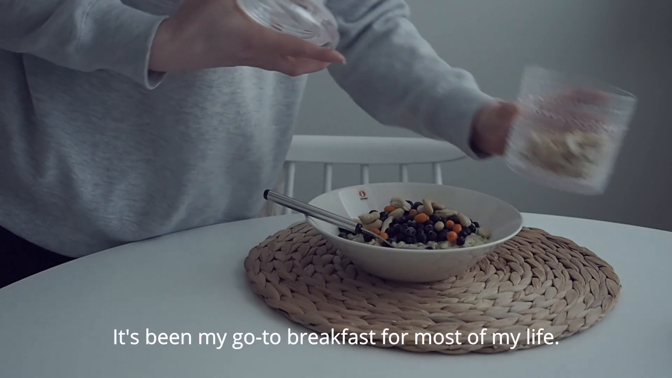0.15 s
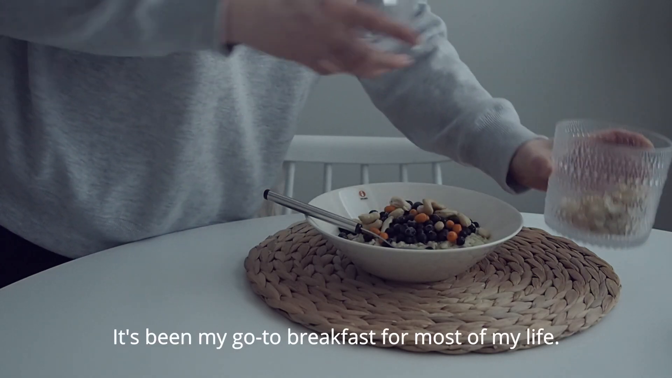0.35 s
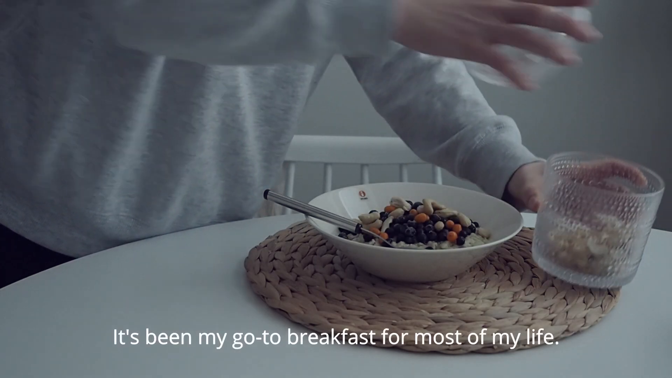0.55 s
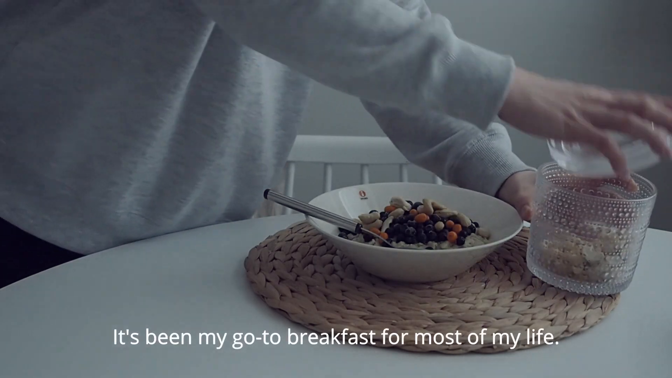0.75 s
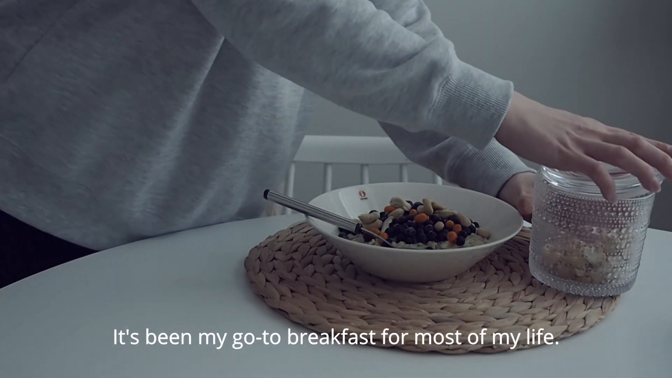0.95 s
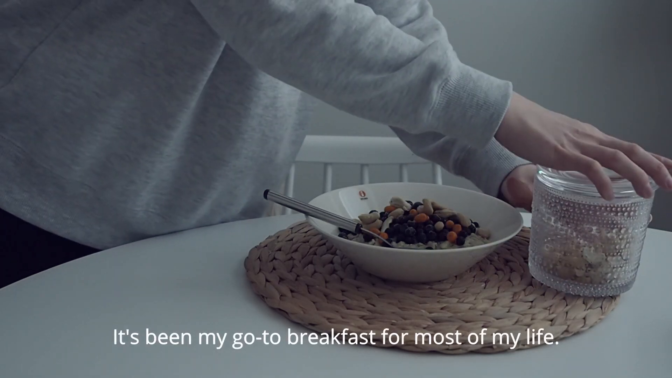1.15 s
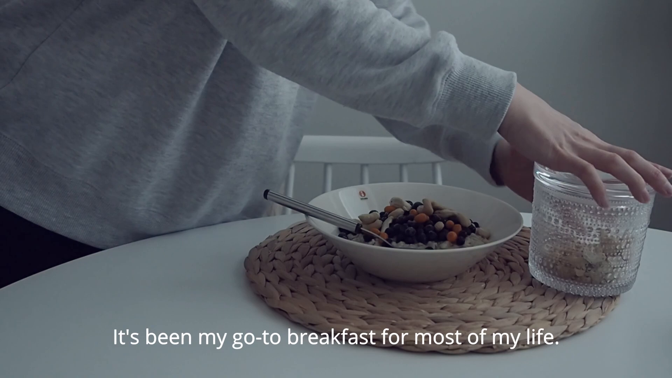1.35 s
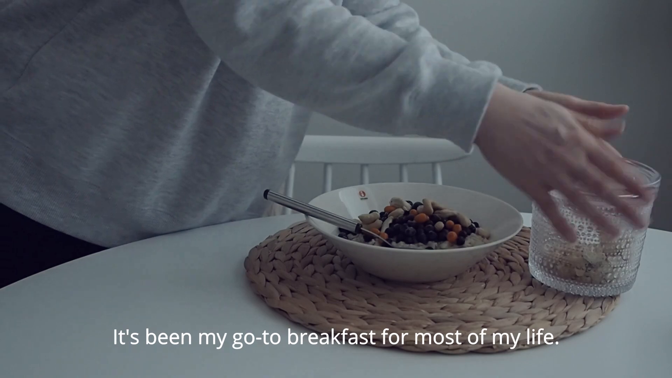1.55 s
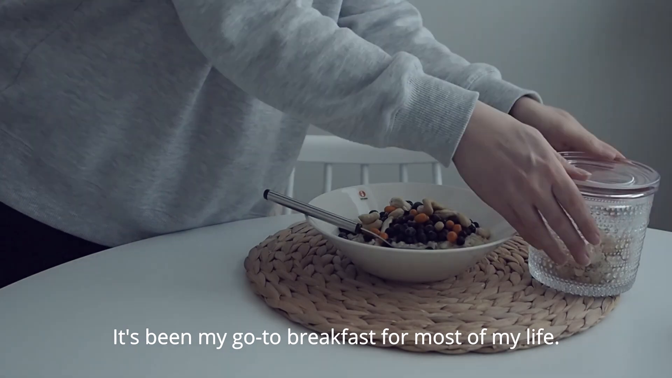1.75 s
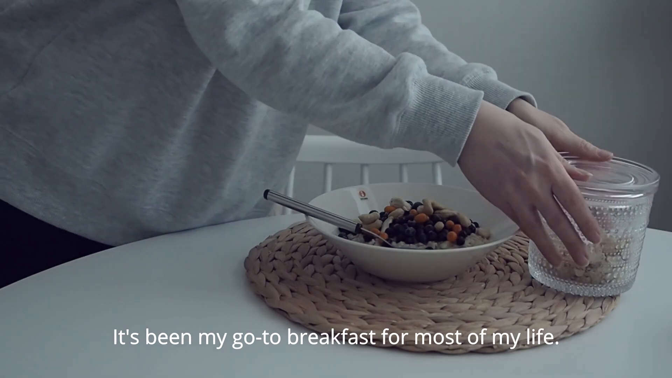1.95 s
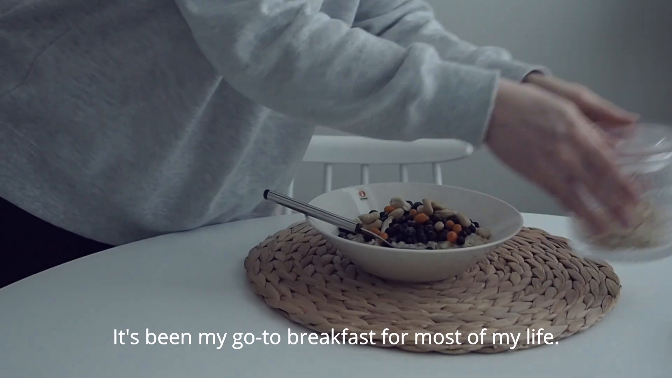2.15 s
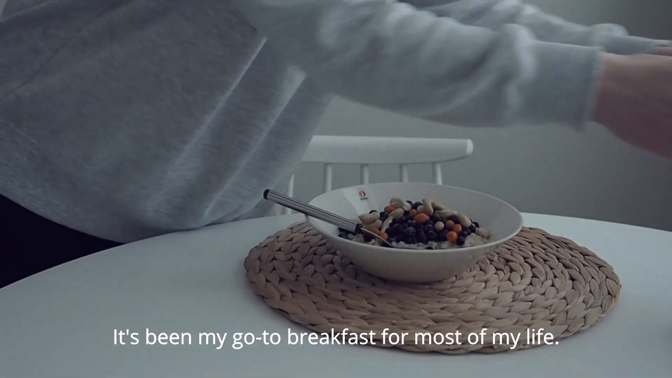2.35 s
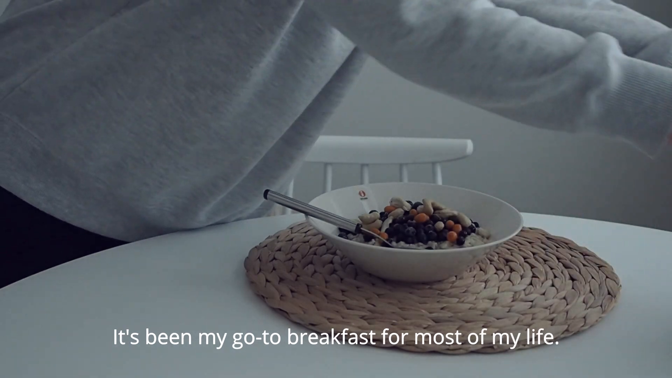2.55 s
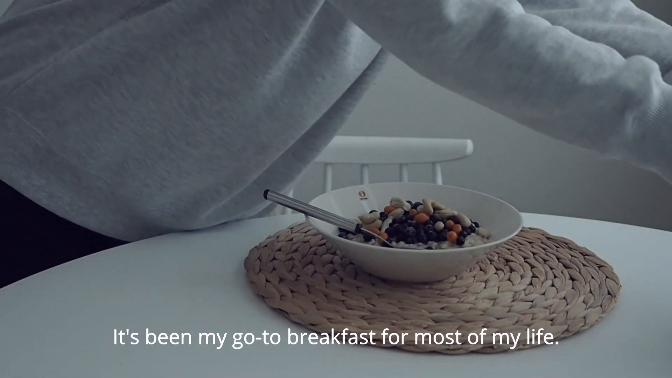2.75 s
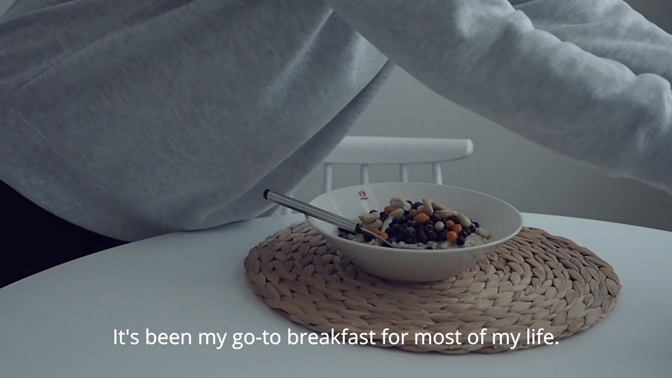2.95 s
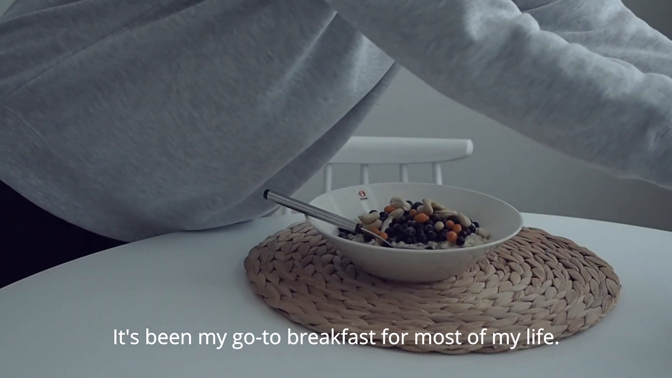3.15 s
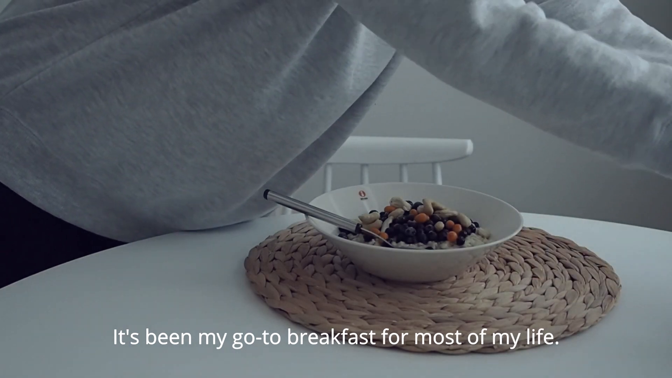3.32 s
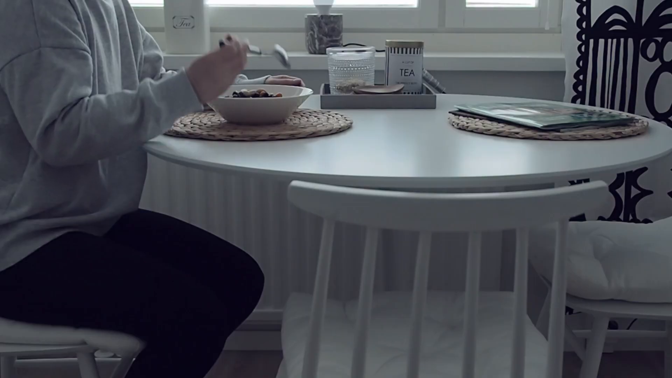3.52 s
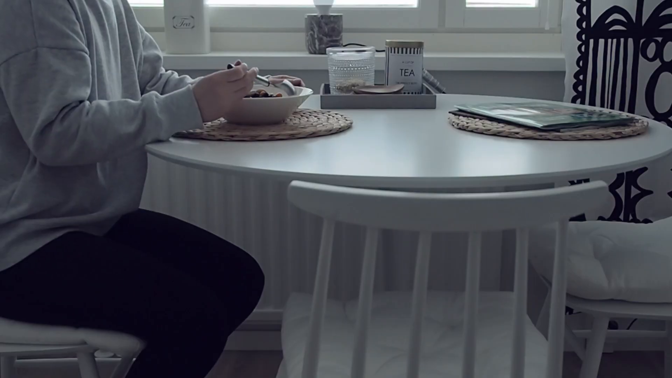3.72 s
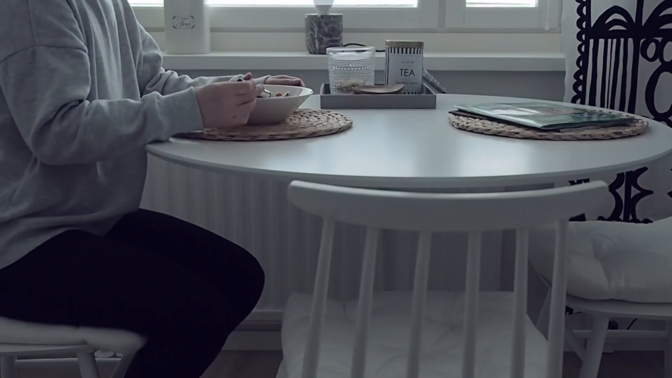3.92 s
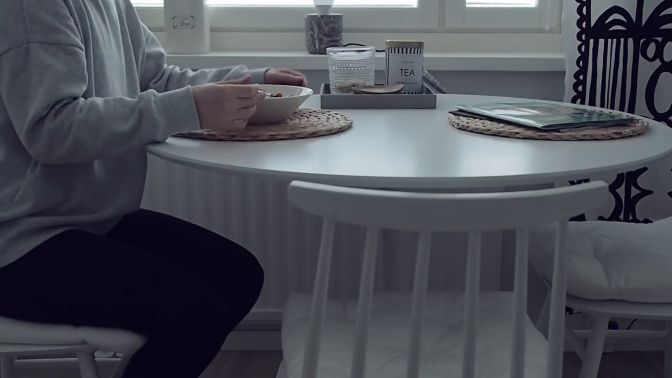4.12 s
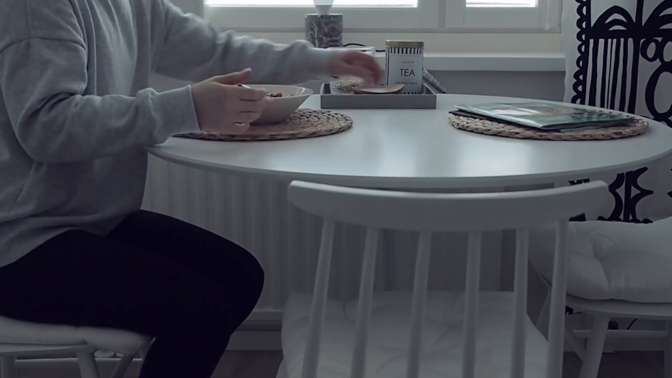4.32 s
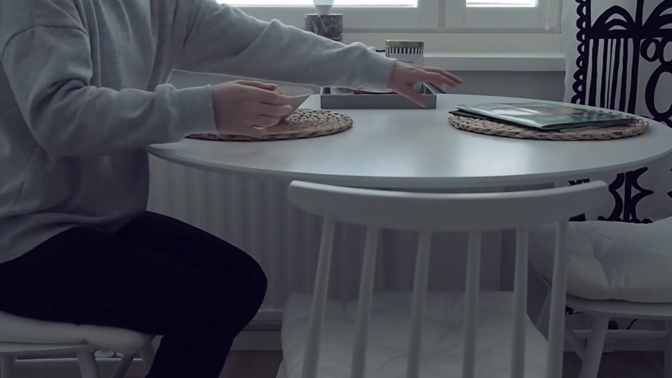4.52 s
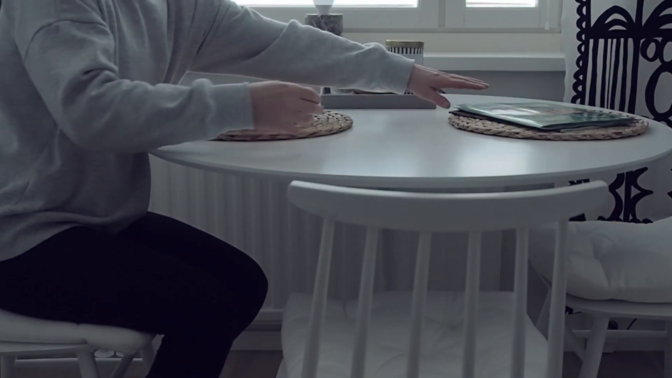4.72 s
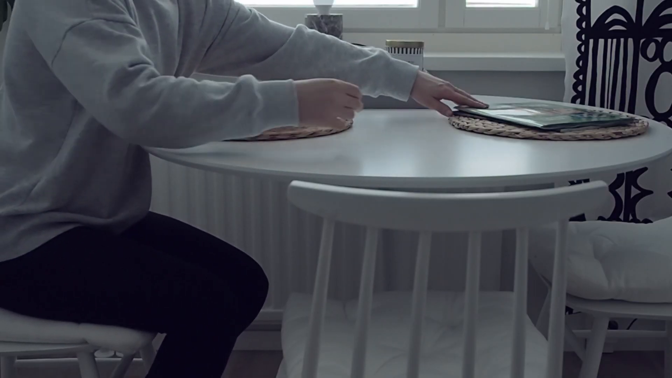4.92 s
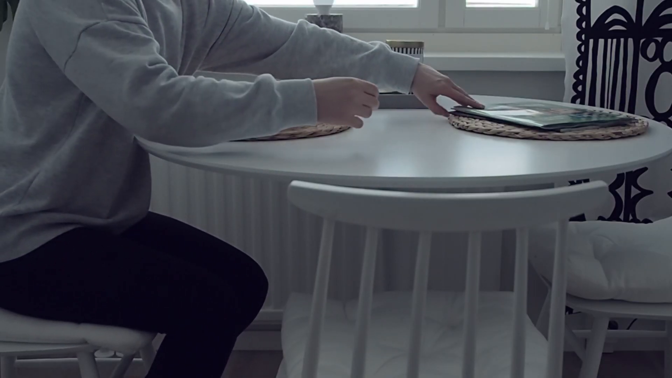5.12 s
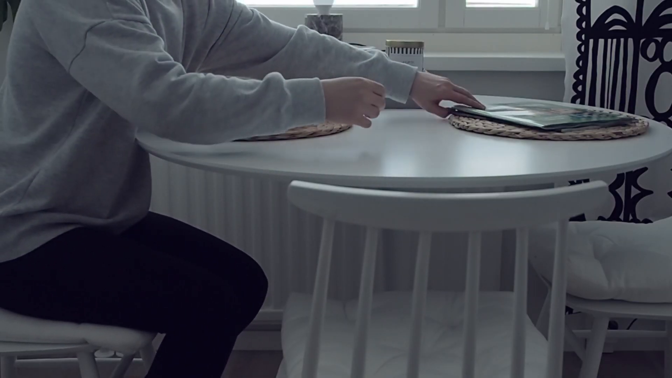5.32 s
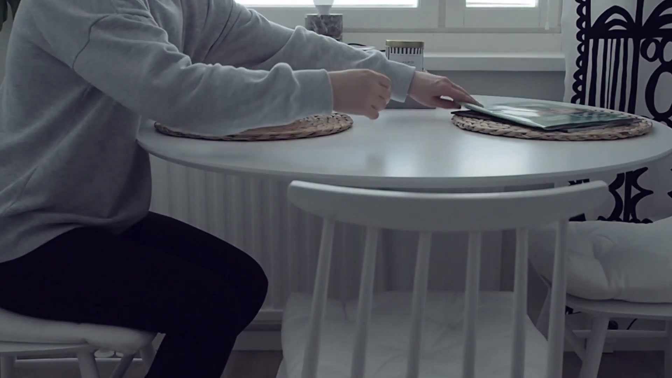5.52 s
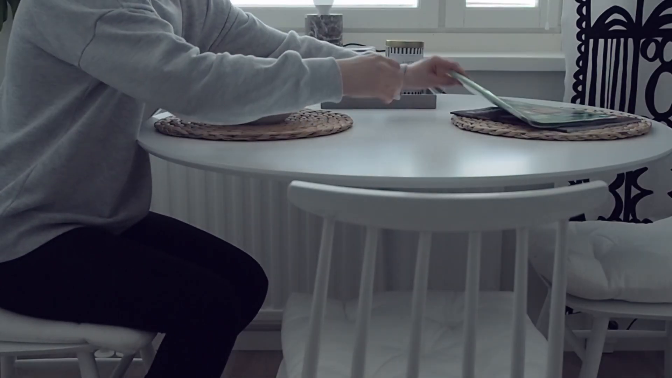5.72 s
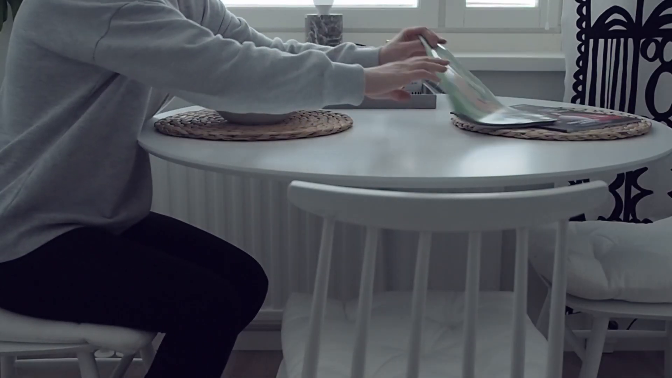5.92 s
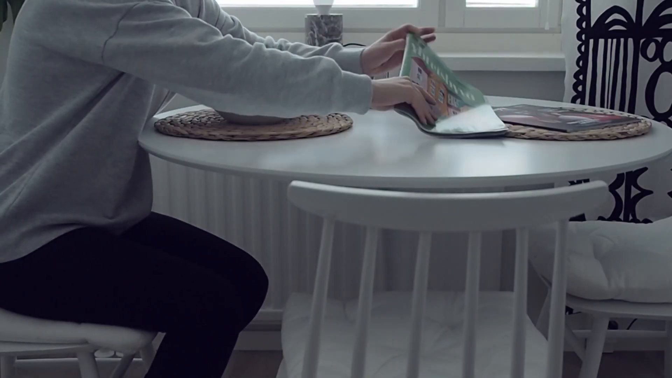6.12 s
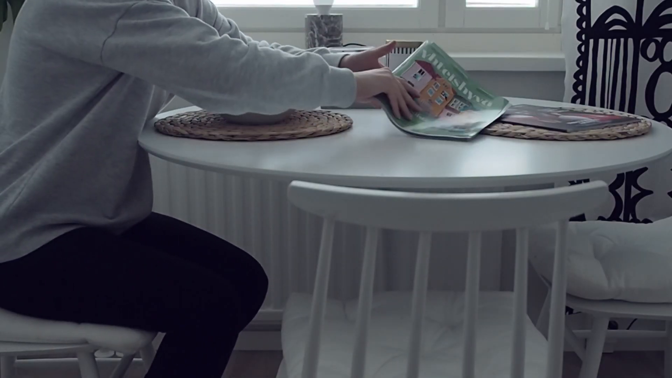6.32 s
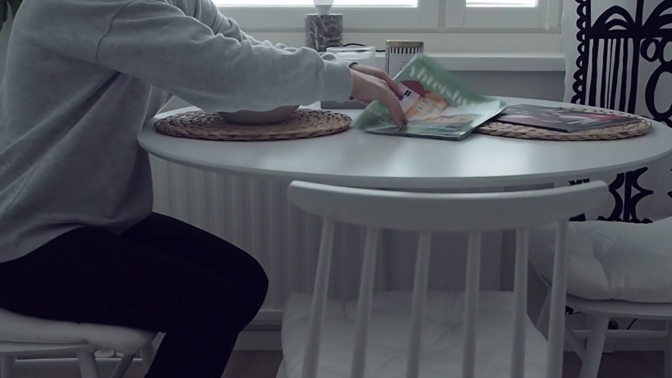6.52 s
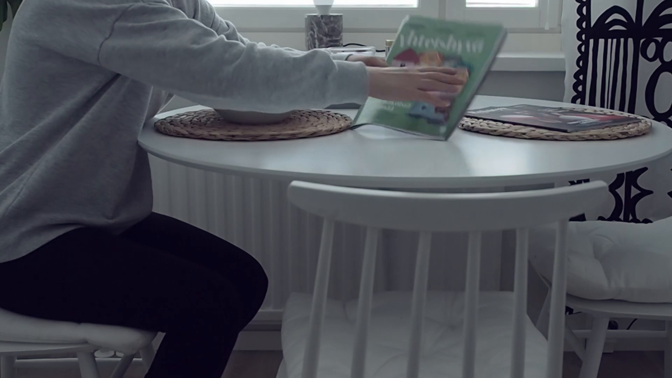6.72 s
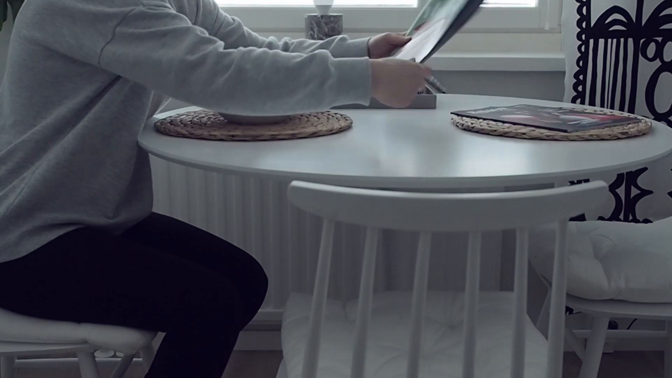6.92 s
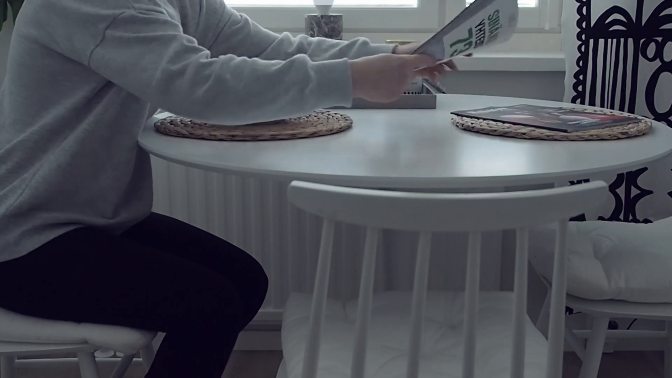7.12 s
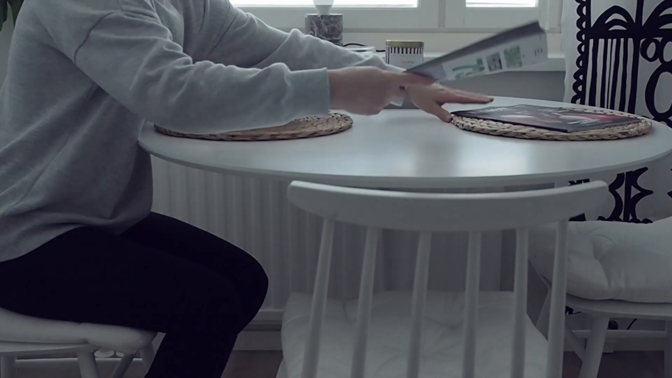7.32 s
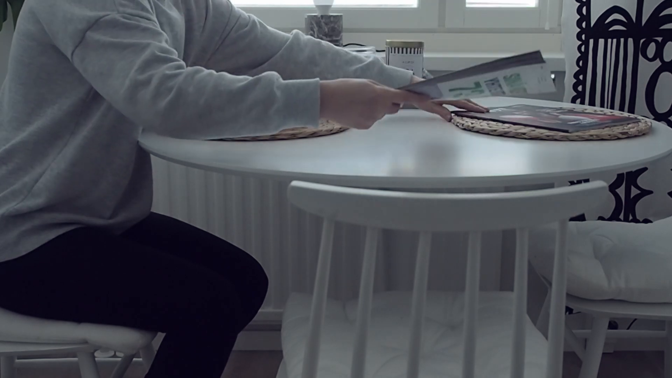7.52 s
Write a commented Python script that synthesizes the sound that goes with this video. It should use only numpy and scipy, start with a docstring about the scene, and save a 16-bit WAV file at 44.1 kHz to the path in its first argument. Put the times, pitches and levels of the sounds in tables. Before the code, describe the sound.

Close stereo pickup of breakfast handling, leaning slightly left, with a short live room tail. Brief cloth rustle and faint glass touches come first, then bright lid-on-jar clinks dying into small rattles. Near silence holds a few dull taps. A heavy wooden knock follows with smaller ones, then sharp spoon-on-bowl clinks. Finally a magazine is dragged over, with dry swishes, fine crackle and soft papery bumps, over faint air noise.

```python
"""A sleeve rubs the table and a glass lid sings under the fingers, then clinks down onto its jar in a bare kitchen.
Soft taps follow; the jar is set down on wood, a spoon drops into a ceramic bowl, and a magazine slides and flaps.
Ringing is modal synthesis, knocks are chattering contacts through damped bodies, sliding is shaped noise.
Blows pass through decaying room responses, over steady faint noise."""
import sys
import numpy as np
from scipy import signal
from scipy.fft import rfft, irfft
from scipy.io import wavfile
from scipy.ndimage import uniform_filter1d

SR = 44100
rng = np.random.default_rng(int(sys.argv[2]) if len(sys.argv) > 2 else 0)


def generate_wav(signal):
    """Clip the signal to [-1, 1] and save it as 16-bit WAV at the path in sys.argv[1]."""
    frames = np.transpose(np.atleast_2d(signal))
    scaled = np.clip(frames, -1, 1) * 32767
    pcm = np.round(scaled).astype(np.int16)
    wavfile.write(sys.argv[1], SR, pcm)


N = 337806  # length of the scene [samples]
SIZE = 32768  # length of one blow with its room tail [samples]
T, HZ = np.arange(SIZE) / SR, np.fft.rfftfreq(SIZE, 1 / SR)

# hiss spectrum of skin, cloth and paper: (frequency [Hz], relative density [dB per Hz])
HISS = [(1000, -30), (4000, 8), (6500, -1), (8500, 3), (11000, -3.5), (15500, -2)]


def amp(db):
    """Decibel law: 20 dB is a factor of ten in amplitude."""
    return 10 ** (np.asarray(db) / 20)


def evened(x):
    """Normalisation to unit root-mean-square value."""
    return x / np.sqrt(np.mean(abs(x) ** 2) + 1e-30)


def read(points, hz):
    """Interpolation along a logarithmic frequency axis, as the ear spaces pitch."""
    f, value = np.transpose(points)
    return np.interp(np.log(hz + 1), np.log(f), value)


def tilt(hz, slope_db):
    """Contact stiffness: harder contacts lean the spectrum towards the treble [dB/octave about 2 kHz]."""
    return amp(slope_db * np.log2(np.clip(hz, 200, 10000) / 2000))


def sides(pan_db):
    """Level difference between the channels: positive values lean to the left."""
    return amp(np.array([[.5], [-.5]]) * pan_db)


def add(mix, s, spectrum):
    """Superposition of one blow; its dB is the rms it would have if packed into a twentieth of a second."""
    fade = np.clip(10 * (1 - T / T[-1]), 0, 1) ** 2
    sound = irfft(spectrum) * np.sqrt(SR / 20) * fade
    part = mix[:, max(round(s * SR), 0):][:, :SIZE]
    part += sound[:, :part.shape[1]]


def room(direct=0.31, early=0.17, early_s=.02, build_s=0.0012):
    """Room impulse response at two microphones: direct sound, a few wall echoes and a dense decaying tail."""
    # reverberation time of the kitchen: (frequency [Hz], t60 [s])
    room_t60 = [(100, 0.74), (300, 0.28), (1000, 0.5), (3000, 0.45), (6000, 0.43), (10000, 0.3),
                (16000, 0.24)]
    hz, t, z = signal.stft(rng.standard_normal((2, SIZE)), SR, nperseg=256)
    decay = amp(-60 * t / read(room_t60, hz)[:, None])
    tail = signal.istft(z * decay, SR, nperseg=256)[1][:, :SIZE]
    tail = evened(tail * (1 - np.exp(-T / build_s))) / np.sqrt(SIZE)
    echoes = (rng.random(size=(2, 8)) * early_s * SR).astype(int)
    echo_gains = early * (2 * rng.random(echoes.shape) - 1)
    np.put_along_axis(tail, echoes, echo_gains, 1)
    tail[[0, 1], rng.integers(10, 40, size=2)] += direct
    return rfft(tail)


def resonance(hz, width_hz):
    """Response of a damped oscillator: unity at its own frequency, width_hz wide."""
    return 1j * HZ * width_hz / (hz ** 2 - HZ ** 2 + 1j * HZ * width_hz)


def struck(modes, share):
    """Modal excitation: where a thing is struck decides which modes sound; this blends two striking places."""
    share = np.clip(share, 0, 1)
    return [(hz, first_db + share * (second_db - first_db), t60) for hz, first_db, second_db, t60 in modes]


def ring(modes, path, slope_db=0, choke_hz=np.inf):
    """Modal superposition in the room; contact damping chokes modes above choke_hz into short, wide bursts."""
    out = np.zeros(path.shape, complex)
    for hz, db, t60 in modes:
        free_width_hz = np.log(1000) / (np.pi * np.clip(t60, .02, .5))
        free = evened(resonance(hz, free_width_hz) * path)
        choked = evened(resonance(hz, .02 * hz) ** 2 * path)
        share = 1 / (1 + (choke_hz / hz) ** 2)  # half the power is choked at choke_hz
        quarter_cycle = np.exp(-2j * np.pi * HZ / (4 * hz))  # keeps the two parts from cancelling
        mode = evened(np.sqrt(1 - share) * free + np.sqrt(share) * choked * quarter_cycle)
        out += rng.choice([-1, 1]) * amp(db) * tilt(hz, slope_db) * mode
    return out


def knock(colour, path, slope_db, contact_s, catches_per_s=2500):
    """Impact excitation: a dying chatter of tiny contacts drives a heavily damped body in the room."""
    log_gain = np.log(amp(read(colour, HZ)) * tilt(HZ, slope_db))
    mirrored = np.r_[log_gain, log_gain[-2:0:-1]]
    body = np.exp(np.conj(signal.hilbert(mirrored))[:len(HZ)])  # minimum phase, hence causal
    catches = rng.standard_normal(SIZE) * (rng.random(SIZE) < catches_per_s / SR)
    chatter = catches * np.exp(-T / contact_s)
    chatter[0] = 0.26  # the first touch
    return evened(body * rfft(chatter) * path)


def hollow_note(hz, db, t60, path, swell_s=0.0024):
    """Damped resonance between gentle low and high cuts: a short hollow note that swells before it decays."""
    note = ring([(hz, db, t60)], path)
    hollow = irfft(note / (1 + (HZ / 2500) ** 2) / (1 + (200 / (HZ + 1)) ** 2))
    return rfft(hollow * (1 - np.exp(-T / swell_s)))


def noise(colour):
    """Spectral shaping of steady random noise, uncorrelated between the two microphones."""
    gain = amp(read(colour, np.fft.rfftfreq(N, 1 / SR)))
    return evened(irfft(rfft(rng.standard_normal((2, N))) * gain, N))


def still_air(floor_db=-56):
    """Stationary background noise: the faint, steady sound of the room's still air."""
    # spectrum of the background: (frequency [Hz], relative density [dB per Hz])
    floor_colour = [(12, -15), (20, 7.5), (35, -13.5), (55, -17), (299, -8), (374, -12.5), (772, -7.5),
                    (1020, -5.5), (1110, -7), (1730, -6.5), (2230, -18), (3030, -10.5), (6250, -23),
                    (8990, -20), (15700, -28)]
    return amp(floor_db) * noise(floor_colour)


def stroke(start, length, t60, speed_up_share=0.57):
    """Friction follows speed: a stroke gathers speed, holds, and dies away once the hand stops."""
    t = np.arange(N) / SR - start
    rise = np.clip(t / (speed_up_share * length), 0, 1)
    return rise * np.exp(-np.log(1000) * np.clip((t - length) / t60, 0, 2))


def sliding(crackle_db=-6, crackles_per_s=200, rub_t60_s=1, hiss_t60_s=0.47):
    """Friction noise: cloth and paper drag over the table while fibres snap free in a fine crackle."""
    # strokes of sleeve and paper: (start [s], length [s], rub level [dB], hiss level before crackle [dB])
    strokes = [(0, 0.054, -53.5, -57), (0.076, 0.11, -51.5, -56), (0.549, 0.04, -56, -60.5),
               (4.375, 0.055, -59.5, -61), (4.803, 0.043, -62, -58), (4.978, 0.12, -61, -61),
               (5.285, 0.13, -56.5, -53), (5.594, 0.27, -53, -54), (5.826, .31, -55, -51),
               (6.22, 0.09, -59.5, -56.5), (6.388, 0.12, -55, -54.5), (6.597, 0.074, -54.5, -54.5),
               (6.806, .08, -55.5, -48), (6.913, 0.034, -57, -73), (7.404, 0.11, -56.5, -58.5),
               (7.58, 0.12, -57, -51.5)]
    # spectrum of the rubbing: (frequency [Hz], relative density [dB per Hz])
    rub_colour = [(150, -55), (500, -11), (1000, -0.5), (2500, -5.5), (4300, -1), (7000, -24), (15000, -36)]
    snaps = rng.exponential(size=N) * (rng.random(N) < crackles_per_s / SR)
    bursts = evened(signal.oaconvolve(snaps, np.exp(-T / .001))[:N])
    rub = noise(rub_colour)
    hiss = noise(HISS) + amp(crackle_db) * bursts * noise(HISS)
    # overlapping strokes add in power
    rub_power = sum((amp(db) * stroke(s, length, rub_t60_s)) ** 2 for s, length, db, _ in strokes)
    hiss_power = sum((amp(db) * stroke(s, length, hiss_t60_s)) ** 2 for s, length, _, db in strokes)
    return rub * np.sqrt(rub_power) + hiss * np.sqrt(hiss_power)


def lid(air_t60=0.028, air_lead_s=0.00501, ring_direct=0.85, contact_s=0.0049, choke_hz=10000):
    """Modal ringing and cavity air: the lid sings under the fingers, then rattles onto the jar with air pops."""
    # lid ringing alone in the hand: (frequency [Hz], level [dB], t60 [s])
    lid_modes = np.transpose([ [823, 1326, 2150, 2985, 6928, 8177, 10645, 13355],
                 [-12, -11, -14, 0, -10, -20, -10, -17], [.05, .25, .05, .13, .14, .1, .14, .1]])
    # jar with its lid: (frequency [Hz], level landing flat [dB], level striking the rim [dB], t60 [s])
    jar_modes = np.transpose([ [1326, 1354, 1565, 2090, 2960, 2990, 3794, 5100, 5160, 6930, 7710, 8160, 8270, 9178, 9362, 10793, 12252, 13370, 14238, 14375, 14710, 15287],
                 [0, -15, -19, -30, -16, -14, -36, -8, -24, -44, -33, -23, -33, -28, -29, -30, -39, -44, -33, -35, -43, -48],
                 [-10, -3, -20, -16, -7, -1, -15, -17, -18, -32, -26, -18, -21, -20, -21, -29, -28, -35, -38, -35, -33, -32],
                 [.35, .14, .15, .1, .1, .28, .15, .22, .06, .15, .08, .12, .05, .1, .06, .12, .08, .08, .1, .08, .05, .08]])
    # skin catching on the lid: (time [s], ring level [dB], ring tilt [dB/octave], scuff level [dB])
    touches = [(0.011, -47, -1, -68), (0.065, -45, -3, -64), (.132, -61, 5, -57), (0.203, -42.5, -1, -50),
               (.225, -54.5, 4.5, -46)]
    # glass on glass: (time [s], ring level [dB], rim share [0-1], ring tilt [dB/octave],
    # knock level [dB], knock tilt [dB/octave], air pop level before its filter and swell [dB])
    clinks = [(.821, -24.5, 0.03, -3, -42, -1.5, -27.5), (.846, -33.5, 0.55, 0, -50, -4, -38),
              (.867, -41, 0.76, -11, -51, -5, -45), (1.017, -25, 0.93, -3.5, -32, 1, -39),
              (1.045, -42, 1, 3, -43, 1, -35.5), (1.075, -35, 0.23, 2, -41, -1, -37.5),
              (1.165, -46, 0.9, -2, -50, 0, -47.5), (1.258, -51, 0.96, 3, -32.5, 3, -45),
              (1.361, -68, 1, -7, -50.5, -13, -62), (2.274, -59.5, 0.8, 5.5, -45, 0.5, -71),
              (2.306, -59, 1, 16, -48.5, 5, -57)]
    # spectrum of the glass knock: (frequency [Hz], relative density [dB per Hz])
    glass_colour = [(120, -57), (250, -13.5), (600, -0.5), (1700, 1.5), (2500, -4.5), (3800, -1),
                    (5600, -15), (6500, -12.5), (7200, -33), (8600, -18.5), (10000, -45), (15500, -44)]
    gap_open_hz, gap_sag_hz_per_s, gap_shut_hz = 743, 855, 293
    out = np.zeros((2, N))
    for s, db, slope_db, scuff_db in touches:
        singing = amp(db) * ring(lid_modes, room(direct=.6), slope_db)
        scuff = amp(scuff_db) * knock(HISS, room(), slope_db=-3.0, contact_s=0.009)
        add(out, s, singing + scuff)
    for s, ring_db, rim, ring_slope_db, knock_db, slope_db, air_db in clinks:
        path = room(direct=ring_direct, build_s=0.0025)
        glass = amp(ring_db) * ring(struck(jar_modes, rim), path, ring_slope_db, choke_hz)
        clack = amp(knock_db) * knock(glass_colour, room(), slope_db, contact_s)
        add(out, s, glass + clack)
        # the pop of air in the closing gap falls steadily from the first clink until the gap is shut
        air_hz = max(gap_open_hz - gap_sag_hz_per_s * (s - clinks[0][0]), gap_shut_hz)
        add(out, s - air_lead_s, hollow_note(air_hz, air_db, air_t60, path))
    return out


def taps(thump_s=6.075, thump_hz=235, thump_db=-55):
    """Damped impacts: dull touches of hands and flaps of paper; the magazine's spine thumps the table once."""
    # soft knocks: (time [s], level [dB], tilt [dB/octave], chatter decay constant [s])
    touches = [(1.74, -53.5, -5.5, 0.011), (2.683, -53.5, -2.5, 0.02), (4.595, -55, -12.5, 0.005),
               (5.559, -46, 4.5, 0.0088), (5.682, -36.5, 0.5, 0.0093), (5.779, -49, 2, .01),
               (6.018, -38.5, 3, 0.045), (6.122, -37.5, 0.5, .007), (6.131, -40, 0, 0.0034),
               (6.419, -45.5, -1, 0.0049), (6.503, -41.5, -2, 0.013), (6.74, -45, -4.5, 0.15)]
    # spectrum of the soft knocks: (frequency [Hz], relative density [dB per Hz])
    paper_colour = [(100, -38), (250, -13.5), (400, -16.5), (650, -4.5), (1100, 2.5), (2000, -0.5),
                    (4200, -3.5), (6500, -19.5), (15000, -41)]
    out = np.zeros((2, N))
    for s, db, slope_db, contact_s in touches:
        touch = knock(paper_colour, room(direct=0.37), slope_db, contact_s, catches_per_s=900)
        add(out, s, amp(db) * touch)
    add(out, thump_s, ring([(thump_hz, thump_db, .06)], room()))
    return out


def jar_on_wood(note_hz=823, note_db=-28, note_t60_s=0.053, note_lead_s=0.00395):
    """Impact and plate radiation: one edge of the foot lands, then the jar drops flat and the board booms."""
    # wooden top under the jar: (frequency [Hz], level before the radiation filter [dB], t60 [s])
    board_modes = [(125.8, -10, 0.49), (167, -3.5, 0.27), (208, 1.5, 0.13), (256, 1, 0.09),
                   (318.6, -2, 0.23), (356, 5, 0.084), (434, -2, 0.1), (535, 5.5, 0.069)]
    # foot meeting wood: (time [s], knock level [dB], tilt [dB/octave], chatter decay constant [s],
    # board level before the radiation filter and halving [dB])
    set_downs = [(3.008, -20, -0.5, 0.0054, -45), (3.04, -33.5, -4.5, 0.01, -66),
                 (3.208, -31.5, 3, 0.0036, -36), (3.217, -26, -2, 0.0081, -36.5),
                 (3.25, -56, -3, .0078, -37)]
    # spectrum of the wooden knock: (frequency [Hz], relative density [dB per Hz])
    wood_colour = [(60, -61), (90, -42), (120, -6), (170, -31), (250, -18.5), (500, -6), (830, -0.5),
                   (1300, -0.5), (1800, -4.5), (3000, -14), (4500, -22), (6800, -37.5), (15000, -51)]
    out = np.zeros((2, N))
    bass_cut = (1j * HZ / (110 + 1j * HZ)) ** 4  # a small board radiates no deep bass
    radiation = bass_cut / (1 + 1j * HZ / 1000) / 2
    for s, db, slope_db, contact_s, board_db in set_downs:
        path = room(direct=.1, build_s=.003)
        boom = amp(board_db) * ring(board_modes, path) * radiation
        add(out, s, boom + amp(db) * knock(wood_colour, path, slope_db, contact_s))
    # a short hollow note swells as the jar lands
    add(out, set_downs[0][0] - note_lead_s, hollow_note(note_hz, note_db, note_t60_s, room()))
    return out


def spoon(choke_hz=6500):
    """Coupled modal ringing: the spoon lands on its back, bounces, then knocks the bowl with its edge."""
    # bowl and spoon together: (frequency [Hz], level landing on its back [dB],
    # level striking with its edge [dB], t60 [s])
    bowl_modes = np.transpose([ [1060, 1190, 1816, 1945, 2736, 2798, 3440, 3721, 3898, 4892, 4935, 5158, 6148, 6290, 7310, 7620, 7745, 8000, 9155, 9325, 10150, 10790, 11125, 13008, 14055, 14810, 15067],
                  [-23, -27, -12, -21, -8, -23, -16, -7, -14, 1, -27, -24, -19, -19, -10, -15, -14, -13, -21, -21, -23, -19, -19, -29, -22, -21, -24],
                  [-24, -20, -19, -13, -4, -5, -16, -17, -10, -10, -9, -15, -15, -21, -22, -15, -16, -17, -25, -12, -32, -27, -16, -18, -32, -27, -17],
                  [.1, .12, .22, .15, .25, .2, .08, .15, .12, .2, .08, .1, .1, .1, .07, .08, .1, .1, .08, .08, .06, .08, .1, .1, .08, .06, .08]])
    # spoon on bowl: (time [s], ring level [dB], edge share [0-1], clatter level [dB], clatter tilt [dB/octave])
    hits = [(3.711, -27, 0.04, -34.5, 1), (3.731, -40, 0, -38, 13), (3.805, -57, 0, -47, -3.5),
            (3.982, -26, 1, -25.5, -0.5)]
    # spectrum of the clatter: (frequency [Hz], relative density [dB per Hz])
    clatter_colour = [(200, -46), (450, -23.5), (750, -10.5), (1200, 1.5), (2100, -2), (4000, -2.5),
                      (5700, -15), (7700, -9.5), (8800, -21), (14800, -50)]
    out = np.zeros((2, N))
    for s, ring_db, edge, clatter_db, slope_db in hits:
        path = room(direct=.1, build_s=.004)
        clatter = amp(clatter_db) * knock(clatter_colour, path, slope_db, contact_s=0.0054)
        ceramic = amp(ring_db) * ring(struck(bowl_modes, edge), path, choke_hz=choke_hz)
        add(out, s, ceramic + clatter)
    return out


def scene():
    """Linear superposition: handled things and sliding, a little to the left, over the still air of the room."""
    # stereo lean of the handled things: (frequency [Hz], left minus right level [dB])
    lean = [(100, 1), (500, 3), (1200, 0.5), (4500, 1), (9000, 2), (13000, 5)]
    things = lid() + taps() + jar_on_wood() + spoon()
    things = irfft(rfft(things) * sides(read(lean, np.fft.rfftfreq(N, 1 / SR))), N)
    return things + sliding() * sides(pan_db=2.5) + still_air() * sides(pan_db=2.0)


def record(dry, edge_hz=15780):
    """Band limitation: a linear-phase low-pass filter removes the highest treble."""
    lowpass = signal.firwin(1023, edge_hz, window=("kaiser", 9), fs=SR)
    return signal.oaconvolve(dry, lowpass[None], "same")


dry = scene()
out = record(dry)
generate_wav(out)
```